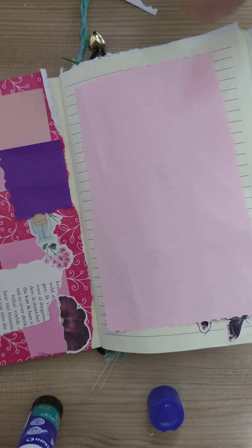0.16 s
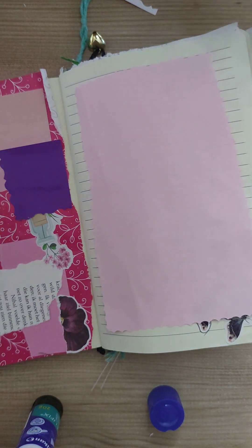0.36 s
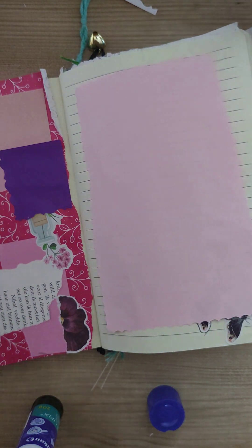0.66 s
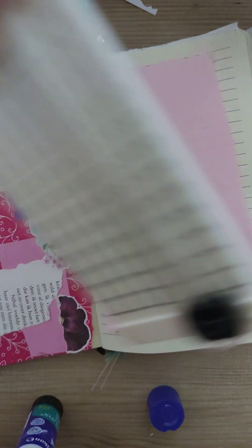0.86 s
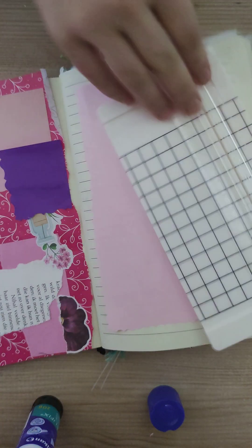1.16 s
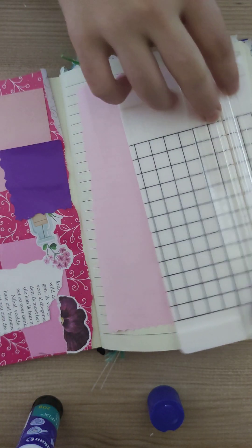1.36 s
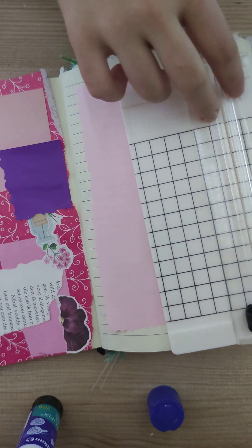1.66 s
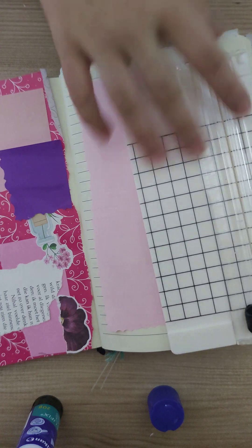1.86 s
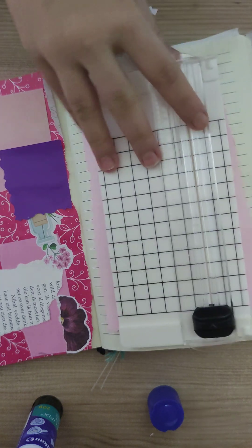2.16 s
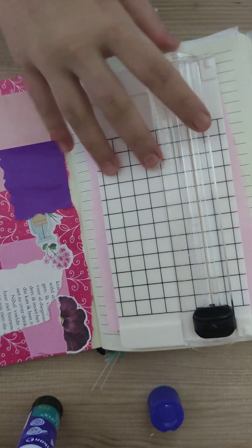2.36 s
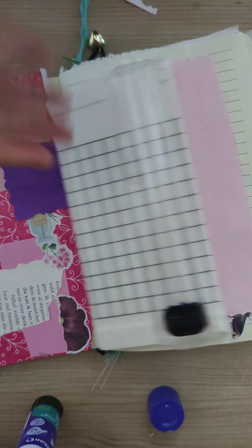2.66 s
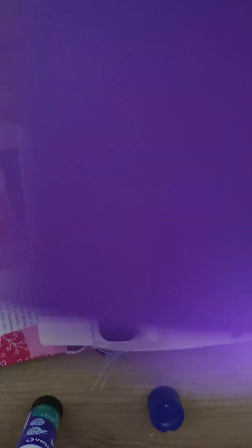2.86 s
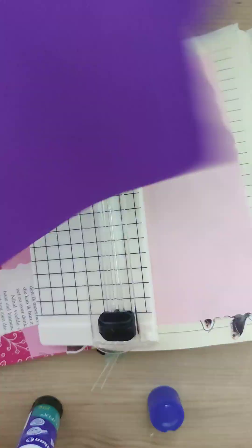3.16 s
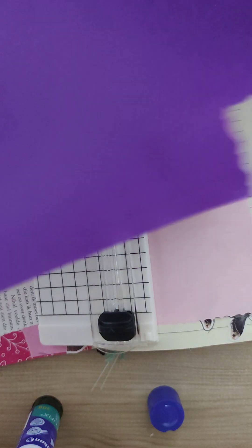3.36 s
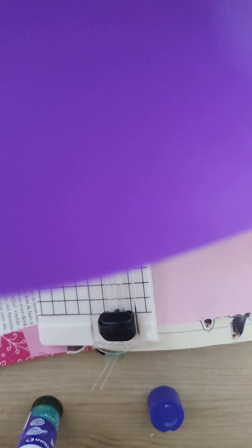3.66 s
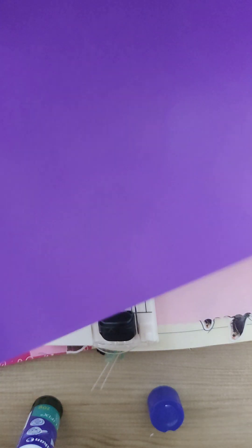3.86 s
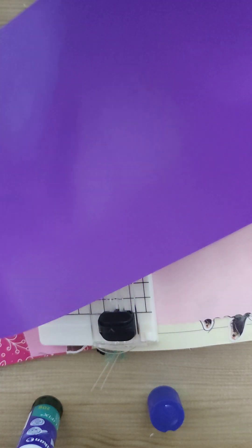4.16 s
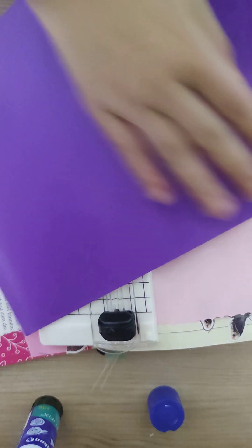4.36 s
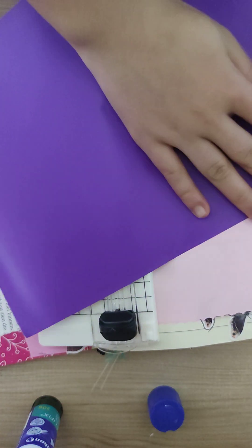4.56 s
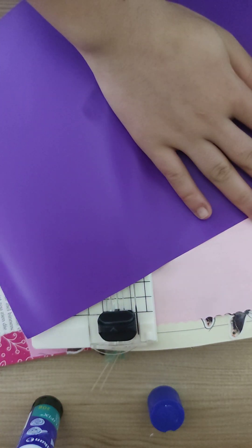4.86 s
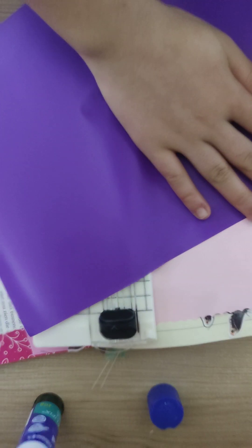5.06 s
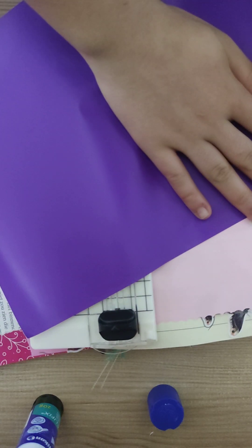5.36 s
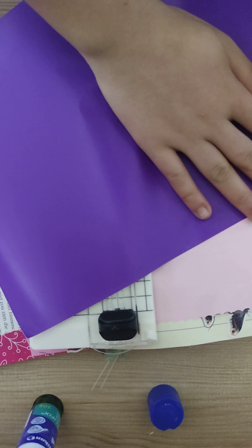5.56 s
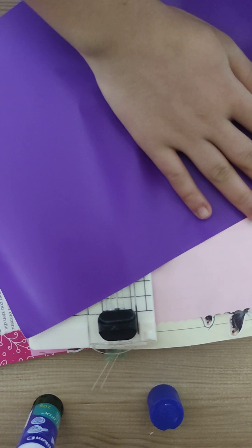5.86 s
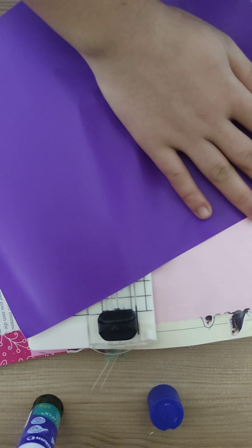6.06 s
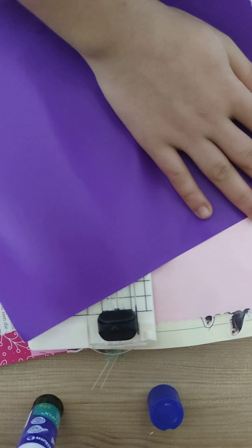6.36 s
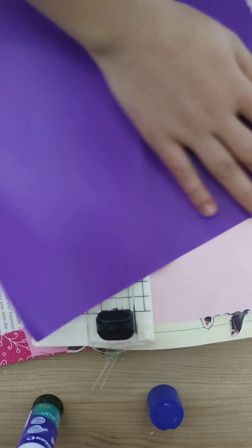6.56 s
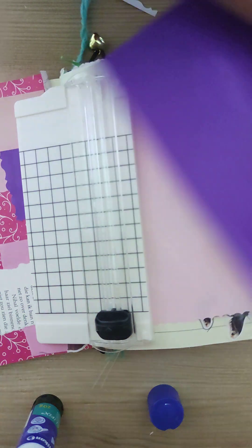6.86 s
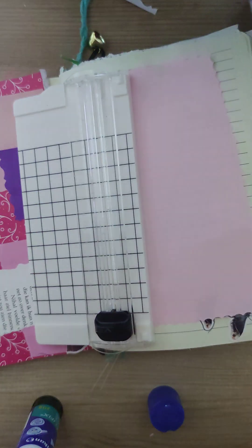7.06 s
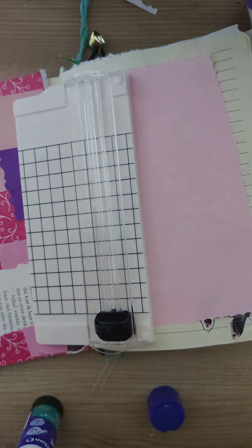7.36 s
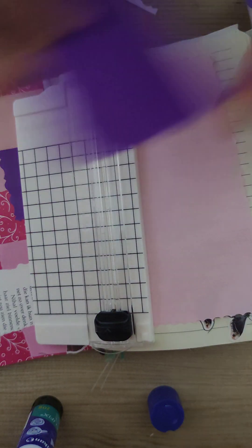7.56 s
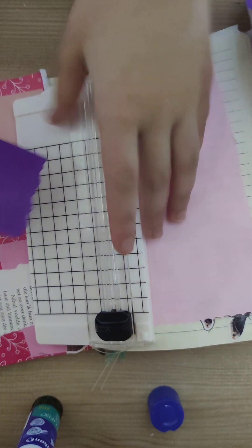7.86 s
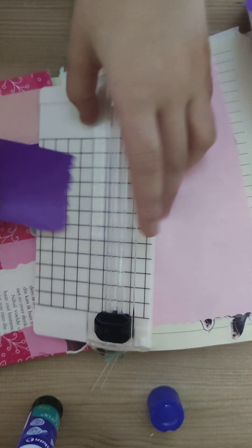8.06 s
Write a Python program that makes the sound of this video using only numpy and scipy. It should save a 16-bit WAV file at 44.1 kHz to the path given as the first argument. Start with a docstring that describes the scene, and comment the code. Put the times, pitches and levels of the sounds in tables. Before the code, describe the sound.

Close up in a small, quiet room, a few knocks and a sharp metallic tap land on a wooden desk. Light plastic clicks, soft scraping and paper rustles follow as a trimmer and a sheet are put in place. Then the paper tears, haltingly at first and then in one quickening run, before it is swished aside with a few faint bumps.

```python
"""Tearing paper at a desk

In a small room, tools knock on a wooden desk and excite its modes; a steel one rings and rocks.
A plastic trimmer clicks onto a notebook and slides into place, and a sheet buckles as it is spread.
The sheet is torn along a ruler, in two tugs and then one quickening run: each breaking fibre is an
impulse that the paper radiates. The sheet is lifted away. Two close microphone ports hear it all."""
import sys
import numpy as np
from scipy import signal
from scipy.fft import rfft, irfft
from scipy.io import wavfile
from scipy.ndimage import uniform_filter1d

SR = 44100
rng = np.random.default_rng(int(sys.argv[2]) if len(sys.argv) > 2 else 0)


def to_wav(sig):
    """Store sig (one row per channel, or 1-D mono) as 16-bit WAV at the path in sys.argv[1].

    Samples outside -1..1 are clipped; the rate is SR.
    """
    pcm = np.clip(np.atleast_2d(sig), -1, 1) * 32767
    pcm = np.round(pcm).astype(np.int16)
    wavfile.write(sys.argv[1], SR, pcm.T)  # frames by channels


N = 362502
TAPS = 4096  # length of an impulse response
FREQ = np.fft.rfftfreq(TAPS, 1 / SR) + 1
TIME = np.arange(N) / SR
AGE = TIME[:SR // 2]  # time since the onset of one event
RUN_START_S, RUN_END_S = 5.472, 6.524  # the long pull of the tear

# bundles of fibres giving way at once: (t/s, level/dB)
SNAPS = [(4.841, -27.5), (4.864, -26), (5.036, -29.5), (5.0728, -24.5), (5.1226, -21), (5.1595, -27.5),
         (5.2166, -22.5), (5.2335, -27), (5.2687, -21.5), (5.446, -38), (5.474, -27), (5.4961, -23),
         (5.535, -23), (5.6037, -24.5), (5.6888, -26.5), (5.7491, -23), (5.8355, -21), (5.884, -22),
         (5.915, -25), (5.9309, -19.5), (5.977, -20), (6.0602, -22), (6.128, -24.5), (6.2742, -20),
         (6.4823, -17.5)]
# short tugs that start the tear: (start t/s, end t/s, level/dB)
TUGS = [(4.843, 4.9, -38.5), (5.046, 5.344, -48)]
# treble spectrum of any contact: (f/Hz, level/dB)
CRISP = [(500, -29), (2200, -2.5), (3800, -1.5), (6000, 0), (9000, 4), (16000, -5)]


def tearing():
    """Fracture: fibres break singly and in bundles, and the sheet radiates each impulse."""
    # radiation spectrum of the sheet: (f/Hz, level/dB)
    sheet_spectrum = [(100, -11.5), (300, -32), (480, -6), (1000, -2), (1800, -4), (3200, -5.5), (5500, -5),
                      (9000, 2), (16000, -7)]
    # its resonances: (f/Hz, width/Hz, level/dB)
    sheet_peaks = [(816, 69, 9.5), (1555, 108, 11.5), (1756, 68, 8.5)]
    # resonance of the freed strip, growing through the run as it lengthens: (t/s, level/dB)
    strip_levels = [(4.9, 9), (5.1, -61), (5.7, 0), (6.1, 7), (6.5, 10.5)]
    # drum modes of the taut sheet: (f/Hz, nominal width/Hz, level/dB)
    drum_modes = [(131.8, 65, -1.5), (585, 94, 3)]
    # fine fizz of the taut edge parting: (t/s, level/dB)
    fizz_levels = [(4.85, 1), (4.92, 8), (5.02, -18), (6.5, -5)]
    effort = tear_effort() * undb(1.6 * walk(rate=170))
    bundles = np.zeros(N)
    giving_way = strike(t60=.034, rise_s=.0013)
    for s, db in SNAPS + slips():
        add(bundles, s, undb(db) * giving_way)
    breaks = effort * crackle(rate=5500, spread_db=4)
    breaks += undb(-2) * bundles * crackle(rate=8000, spread_db=2.5)
    fibres = fibre_patches(breaks)
    strip = resonate(breaks, hz=2350, width=230) * gain_curve(strip_levels)
    strip *= undb(2 * walk(rate=33))  # the loose strip flutters
    drum = np.zeros(N)
    for hz, width, db in drum_modes:
        drive = breaks * undb(1.8 * walk(rate=45))
        drum += undb(db) * resonate(resonate(drive, hz, 2 * width), hz, 2 * width)
    edge_noise = (effort + bundles) * rng.standard_normal(N) * gain_curve(fizz_levels)
    fizz = butterworth(edge_noise, 3, 10500, "high")
    radiated = colour(fibres + strip, sheet_spectrum, sheet_peaks) + drum + fizz
    return travelling(radiated, t60=.019, direct=.54, spots=4)


def tear_effort():
    """Fracture follows the pull: the envelope of the even tearing, two tugs and then the run."""
    # strength of the run, louder as it gathers speed: (t/s, level/dB)
    run_levels = [(5.48, -41.5), (5.494, -39), (5.736, -62), (5.76, -47.5), (6.188, -35), (6.282, -27),
                  (6.456, -37.5), (6.52, -30)]
    # even tearing gains on the snaps toward the end
    smoothing = gain_curve([(RUN_START_S, -1), (RUN_END_S, 1.5)])
    run = pull(RUN_START_S, RUN_END_S) * gain_curve(run_levels) * smoothing
    return run + sum(undb(db) * pull(start, end) for start, end, db in TUGS)


def pull(start, end, rise_s=.0052, t60=.053):
    """Loading and relaxation: tension builds, holds, and decays when the hand stops."""
    rise = 1 - np.exp(-np.maximum(TIME - start, 0) / rise_s)
    return rise * np.exp(-np.log(1000) * np.maximum(TIME - end, 0) / t60)


def slips(spacing_s=.023, jitter=.15, fall_db=1.9):
    """Stick-slip: weakening slips follow a snap until the next or the pull's end; (t/s, level/dB)."""
    stops = [s for s, db in SNAPS] + [end for start, end, db in TUGS] + [RUN_END_S]
    rows = []
    for s, db in SNAPS:
        gap = min((stop for stop in stops if stop > s), default=s) - s
        steps = max(round(gap / spacing_s), 1)
        for k, (late, chance_db) in enumerate(rng.standard_normal((steps - 1, 2)), 1):
            rows.append((s + gap * (k + jitter * late) / steps, db - 4 - k * fall_db + chance_db))
    return rows


def fibre_patches(breaks, octaves=7):
    """Inhomogeneity: each patch of fibres has its own colour, so octaves swell and fade separately."""
    log_centres = np.log(np.geomspace(200, 12800, octaves))
    log_hz = np.log(np.fft.rfftfreq(N, 1 / SR) + 1)
    weights = np.array([np.interp(log_hz, log_centres, one) for one in np.eye(octaves)])
    bands = irfft(rfft(breaks) * weights, N)
    return sum(band * undb(1.9 * walk(rate=90)) for band in bands)


def flexing():
    """Buckling: the sheet gives in quick clusters of dull pops, pitched by the panel that bends."""
    # buckles and flaps: (t/s, body level/dB, treble re body/dB, panel f/Hz)
    flexes = [(1.283, -43, -28, 1470), (2.007, -46, -30, 830), (2.723, -41, -30, 1340),
              (2.742, -48, -23, 1160), (3.036, -55, 2.5, 1600), (3.134, -42, -10, 1200),
              (3.178, -38.5, -2.5, 1920), (3.21, -38.5, 1, 1600), (3.674, -44.5, -20, 1500),
              (3.762, -39.5, -39, 1790), (3.799, -40, -5.5, 1700), (3.83, -45.5, -18, 1760),
              (3.962, -35, -25, 1750), (3.98, -39, -12, 1400), (4.193, -41, -22, 1200),
              (4.377, -50, -7, 700), (4.67, -46, -28, 810), (6.713, -45, -1, 2380), (6.769, -48, 1, 1690),
              (6.81, -47, -6, 1010), (6.847, -42, -17, 710), (6.873, -45, -5, 1800)]
    # body spectrum of bending paper: (f/Hz, level/dB)
    paper_spectrum = [(100, 8), (300, -2), (550, 3.5), (1000, 2), (1800, 0), (2800, -9.5), (4500, -15.5),
                      (12000, -52)]
    body, treble = np.zeros((2, N))
    grains = crackle(rate=9400, spread_db=0)
    buckle = strike(t60=.086, rise_s=.002)
    for s, db, treble_db, hz in flexes + crinkles():
        pops = undb(db) * buckle * np.roll(grains, int(s * SR))[:len(AGE)]
        panel = undb(7.5) * resonate(pops, hz, width=.39 * hz)
        add(body, s, pops + panel)
        add(treble, s, undb(db + treble_db) * buckle)
    ticks = colour(treble * crackle(rate=5000, spread_db=2.5), CRISP)
    radiated = undb(-1) * colour(body, paper_spectrum) + undb(1) * ticks
    return travelling(radiated, t60=.0083, direct=.75, spots=3)


def crinkles(per_s=12):
    """Local buckling of handled paper, at random: (t/s, body level/dB, treble re body/dB, f/Hz)."""
    # spells of handling: (start t/s, end t/s)
    handled = [(2.05, 2.75), (3.23, 3.4), (3.8, 4.6), (6.72, 7.4)]
    moments = [s for start, end in handled for s in np.arange(start, end, 1 / per_s)]
    chance = rng.uniform(-.91, 1, (len(moments), 3))
    return [(s + late / per_s / 2, -57.5 + 9 * size, -8.5, 1100 * 2 ** octave)
            for s, (late, size, octave) in zip(moments, chance)]


def desk():
    """Impact on a plate: a soft blow excites the desk's low modes, a hard one the higher."""
    # blows on the desk: (t/s, level/dB, contact cut-off f/Hz)
    knocks = [(0.0, -24, 2050), (0.010, -17, 1920), (0.368, -21.5, 2330), (0.499, -22.5, 610),
              (0.535, -14, 1100), (1.287, -50.5, 500), (3.198, -30, 160), (3.502, -28.5, 105),
              (7.168, -37.5, 510), (7.186, -40, 350), (7.524, -44, 449)]
    # distinct modes of the desk top: (f/Hz, level/dB, t60/s)
    desk_modes = [(119, 1.5, .2), (162, -1, .2), (200, -4, .18), (274, -1, .25), (570, -12, .24),
                  (790, -9, .16), (893, -12, .18), (1150, -14, .17)]
    # spectrum of its dense modes: (f/Hz, level/dB)
    dense_spectrum = [(40, -30), (85, -10.5), (125, 1.5), (190, -1), (280, -1), (400, -14.5), (800, -1),
                      (1300, -7), (3000, -6.5), (9000, -22.5)]
    out = np.zeros((2, N))
    for s, db, cut_hz in knocks + rocking():
        mid, side = rng.standard_normal((2, len(AGE))) * strike(t60=.1, rise_s=.0075)
        side = butterworth(side, 2, 170, "high")  # long waves reach both ports alike
        dense = colour(np.array([mid + side, mid - side]), dense_spectrum)
        blow = undb(-14.5) * ring(desk_modes) + dense
        add(out, s, undb(db) * butterworth(blow, 2, [cut_hz / 10, cut_hz], "band"))
    return out


def steel_tool():
    """Free vibration: tapped steel rings in its modes and buzzes briefly against the wood."""
    # modes of the tool: (f/Hz, level/dB, t60/s)
    steel_modes = [(2850, -10, .07), (5190, -12, .11), (6751, -9, .12), (7058, -3, .18), (7779, -13, .13)]
    out = np.zeros((2, N))
    buzz = undb(-4) * colour(rng.standard_normal((2, len(AGE))) * fade(t60=.25), CRISP)
    add(out, TAP_S, undb(-23) * (ring(steel_modes) + buzz))
    return out


TAP_S = .3695  # the steel tool lands


def rocking(period_s=.0232, fall_db=3.5):
    """Inelastic contact: the tool rocks, each knock weaker; (t/s, level/dB, cut-off f/Hz)."""
    return [(TAP_S + (k + 1) * period_s, -20 - k * fall_db, 950) for k in range(4)]


def clicks():
    """Impulse excitation: sharp contacts drive many heavily damped modes, heard as noise bursts."""
    # contacts of plastic, tools and taut paper: (t/s, body level/dB, treble offset/dB)
    contacts = [(0.014, -12.5, -10.5), (0.369, -16, 2.5), (0.46, -34.5, -7.5), (0.498, -34.5, -27),
                (0.51, -33, -21), (0.534, -25, -20.5), (0.601, -36, -25), (1.148, -35.5, -22),
                (1.178, -31, -26), (1.187, -22, -16), (1.206, -29.5, -4.5), (1.304, -42, 5),
                (1.335, -34, -19), (1.455, -40.5, -3), (1.858, -39, -16), (2.009, -39.5, -35),
                (2.199, -37, -5), (3.090, -32.5, -10.5), (3.209, -21.5, -31), (3.27, -49, 0.5),
                (3.504, -35.5, -9), (4.482, -40.5, -18), (4.647, -39.5, -10), (4.761, -24, -26),
                (6.383, -23.5, 2), (7.23, -39, -5), (7.524, -45, -11.5)]
    # body spectrum of hard plastic: (f/Hz, level/dB)
    plastic_spectrum = [(120, -31), (400, -10), (900, 1.5), (1600, 5), (3000, 0.5), (5000, -7),
                        (12000, -45.5)]
    body, treble = np.zeros((2, 2, N))
    for s, db, treble_db in contacts:
        t60 = np.interp(db, [-22.5, -13.5], [.055, .1])  # a light click dies sooner
        bursts = rng.standard_normal((2, 2, len(AGE))) * strike(t60, rise_s=.00017)
        add(body, s, undb(db) * bursts[0])
        add(treble, s, undb(db + treble_db) * bursts[1])
    return undb(-11.5) * colour(body, plastic_spectrum) + undb(1.5) * colour(treble, CRISP)


def sliding():
    """Friction: surfaces catch on countless tiny bumps as each stroke gathers speed and stops."""
    # strokes of plastic, hands and paper: (start t/s, end t/s, treble level/dB, body level/dB)
    strokes = [(1.166, 1.594, -62, -62), (1.6, 1.905, -66, -67.5), (1.984, 2.256, -55.5, -59.5),
               (2.256, 2.454, -61, -68), (2.432, 2.569, -56.5, -62), (2.557, 2.815, -60, -59.5),
               (2.79, 2.975, -56, -60), (3.083, 3.273, -67, -52.5), (3.2, 3.4, -70.5, -67),
               (3.75, 4.047, -71, -58.5), (3.997, 4.623, -71, -62), (4.545, 4.887, -61.5, -65.5),
               (4.813, 4.939, -52.5, -51.5), (5.044, 5.363, -72, -53.5), (6.628, 7.036, -51.5, -56.5),
               (6.874, 7.175, -59, -51), (7.063, 7.133, -48.5, -58), (7.13, 7.3, -62, -61.5),
               (7.55, 7.807, -62.5, -65), (7.79, 8.008, -62.5, -65), (7.976, 8.226, -59.5, -61)]
    # body spectrum of a sliding contact: (f/Hz, level/dB)
    rub_spectrum = [(150, 4.5), (350, -5.5), (580, 0.5), (900, 4.5), (1500, 5), (2400, 3), (4000, -4),
                    (10000, -46)]
    envelopes = np.zeros((2, N))
    for start, end, treble_db, body_db in strokes:
        progress = np.linspace(0, 1, int((end - start) * SR), endpoint=False)
        arc = np.sqrt(np.sin(np.pi * progress))
        add(envelopes, start, undb([[treble_db], [body_db]]) * arc)
    treble, body = envelopes * undb(2 * walk(rate=35))  # uneven pressure
    bumps = np.array([[crackle(rate=9900, spread_db=4.5) for port in range(2)] for band in range(2)])
    scratch = undb(-.5) * colour(treble * bumps[0], CRISP)
    return scratch + undb(-2.5) * colour(body * bumps[1], rub_spectrum)


def travelling(x, t60, direct, spots, changes_per_s=45):
    """Moving source: the sounding spot shifts over the sheet, so its reflections keep changing."""
    spot = (TIME * changes_per_s).astype(int) % spots
    shares = [uniform_filter1d((spot == k) * 1., size=128) for k in range(spots)]
    return sum(scatter(x * share, t60, direct) for share in shares)


def scatter(x, t60, direct, lag_s=.0004):
    """Early reflections from desk, book and hands join the direct sound, which arrives left first."""
    paths = unit_energy(rng.standard_normal((2, TAPS)) * fade(t60)[:TAPS])
    paths[0, 0] += direct
    paths[1, int(lag_s * SR)] += direct
    # many paths together leave the colour nearly even
    ripple_db = 20 * np.log10(np.abs(rfft(paths)))
    evening = np.array([response(-.9 * db) for db in ripple_db])
    return through(x, unit_energy(through(paths, evening)))


def room(x, wet_db=-14, low_t60=.24, high_t60=.09):
    """Reverberation: a small furnished room absorbs treble sooner than bass."""
    noise = rng.standard_normal((2, len(AGE)))
    low = butterworth(noise, 1, 2500, "low")
    build_up = 1 - np.exp(-AGE / .0027)
    tail = (low * fade(low_t60) + (noise - low) * fade(high_t60)) * build_up
    return x + undb(wet_db) * through(x, unit_energy(tail))


def background():
    """Noise floor: a slowly swelling rumble common to both ports, and independent hiss in each."""
    # room rumble: (f/Hz, level/dB)
    rumble_spectrum = [(10, -5.5), (33, -3), (55, -12), (95, -11), (150, -19), (300, -37.5), (1000, -61.5),
                       (4000, -83.5)]
    # microphone hiss: (f/Hz, level/dB)
    hiss_spectrum = [(100, 1), (250, 7.5), (500, 0), (1000, -0.5), (2500, -3), (5000, -12), (7600, -10),
                     (10000, 3), (15500, 0)]
    rumble = colour(rng.standard_normal(N) * undb(1.8 * walk(rate=3.173)), rumble_spectrum)
    hiss = colour(rng.standard_normal((2, N)), hiss_spectrum)
    return undb(-57) * rumble + undb(-62.5) * hiss


def undb(db):
    """Amplitude ratio of a level in decibels."""
    return 10 ** (np.asarray(db) / 20)


def gain_curve(points):
    """Gain over time, interpolated from (t/s, level/dB)."""
    return undb(np.interp(TIME, *np.transpose(points)))


def fade(t60):
    """Damping: exponential decay by 60 dB in t60 seconds."""
    return np.exp(-np.log(1000) * AGE / t60)


def strike(t60, rise_s):
    """Transient envelope: a quick rise, then decay."""
    return fade(t60) * (1 - np.exp(-AGE / rise_s))


def ring(modes):
    """Modal sum: damped sinusoids, in a different phase at each port."""
    out = np.zeros((2, len(AGE)))
    for hz, db, t60 in modes:
        phase_cycles = rng.random((2, 1)) * min(hz / 1000, 1)
        out += undb(db) * fade(t60) * np.sin(2 * np.pi * (hz * AGE + phase_cycles))
    return out


def walk(rate):
    """Random modulation: ramps to a new value every 1 / rate seconds; spread near 1."""
    hold = int(SR / rate)
    steps = rng.standard_normal(N)[np.arange(N) // hold]
    return uniform_filter1d(steps, hold) * np.sqrt(3 / 2)


def crackle(rate, spread_db):
    """Shot noise: rate random impulses a second, their sizes scattered by spread_db; rms 1."""
    size = undb(spread_db * np.minimum(rng.standard_exponential(N), 4))
    impulses = (rng.random(N) < rate / SR) * rng.choice([-1, 1], N) * size
    return impulses / impulses.std()


def resonate(x, hz, width):
    """Resonance with gain 1 at its centre."""
    return signal.lfilter(*signal.iirpeak(hz, hz / width, fs=SR), x)


def butterworth(x, order, hz, kind):
    """Filter with a maximally flat passband."""
    return signal.sosfilt(signal.butter(order, hz, kind, fs=SR, output="sos"), x)


def colour(x, points, peaks=()):
    """Spectral shaping: white sound takes on a contour and resonances, keeping its power."""
    peaks_db = sum(db / (1 + (2 * (FREQ - hz) / width) ** 2) for hz, width, db in peaks)
    return through(x, unit_energy(response(contour(points) + peaks_db)))


def contour(points):
    """Level at every frequency, interpolated from (f/Hz, level/dB)."""
    hz, db = np.transpose(points)
    return np.interp(np.log(FREQ), np.log(hz), db)


def response(db):
    """Minimum-phase impulse response with the given levels."""
    cepstrum = irfft(np.log(undb(db)))
    cepstrum[1:TAPS // 2] *= 2
    cepstrum[TAPS // 2 + 1:] = 0
    return irfft(np.exp(rfft(cepstrum)))


def unit_energy(h):
    """Normalise each impulse response to energy 1."""
    return h / np.linalg.norm(h, axis=-1, keepdims=True)


def through(x, h):
    """Convolution with an impulse response."""
    return signal.oaconvolve(np.atleast_2d(x), np.atleast_2d(h), axes=-1)[:, :x.shape[-1]]


def add(track, s, sound):
    """Superpose a sound on a track at s seconds."""
    start = max(int(s * SR), 0)
    track[..., start:start + sound.shape[-1]] += sound[..., :N - start]


def scene():
    """Superposition: all sources sound into the room, over the noise floor."""
    return room(desk() + steel_tool() + clicks() + flexing() + sliding() + tearing()) + background()


def record(dry, top_hz=15900):
    """Transduction: each port resonates, saturation rounds the peaks, and a low-pass cuts the top."""
    # response of the two microphone ports: (f/Hz, left level/dB, right level/dB)
    ports = [(118, 6, 4), (258, 2.5, 9.5), (378, 7, -7.5), (566, 7, 11.5), (730, 3.5, -1.5),
             (1100, 2.5, -3), (2310, 2.5, 4), (6100, 6.5, 5.5), (7230, 8.5, 4), (7540, 14, -10.5),
             (8780, -1, -11), (10000, -7, -11.5), (11800, -10, -9), (15500, -11.5, -4.5)]
    hz, *sides = np.transpose(ports)
    heard = through(dry, np.array([response(contour(np.c_[hz, db])) for db in sides]))
    return signal.sosfilt(signal.ellip(10, .2, 70, top_hz, fs=SR, output="sos"), np.tanh(heard))


dry = scene()
out = record(dry)
to_wav(out)
```